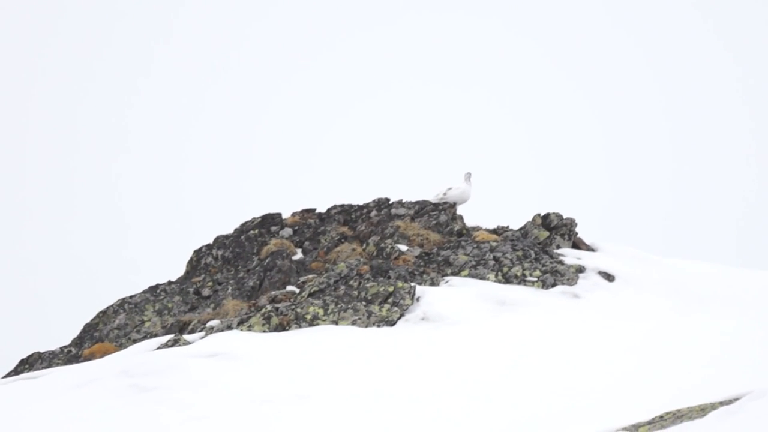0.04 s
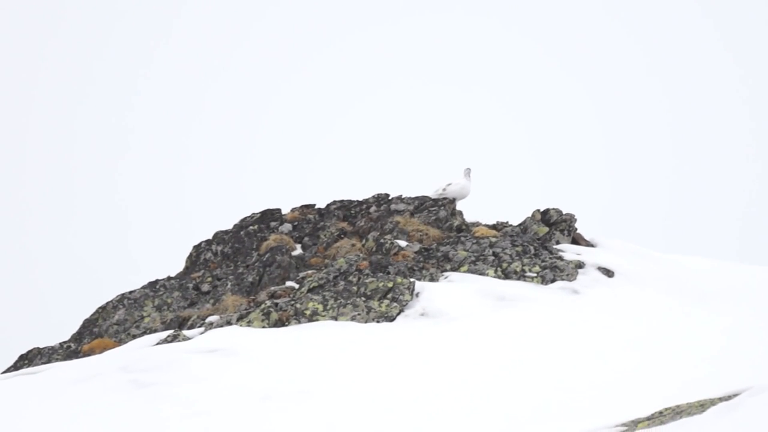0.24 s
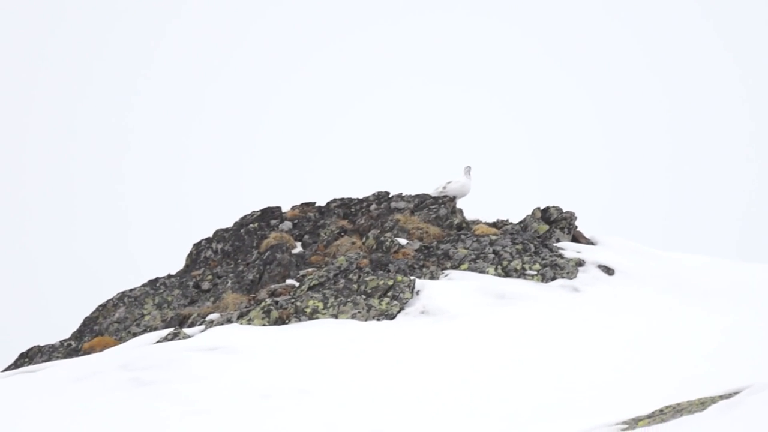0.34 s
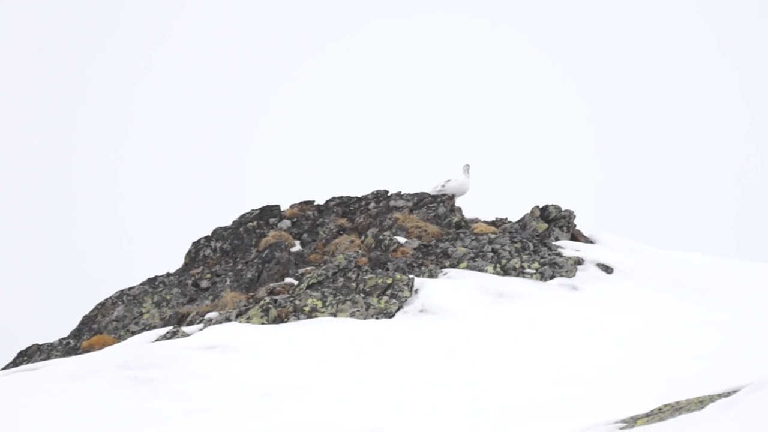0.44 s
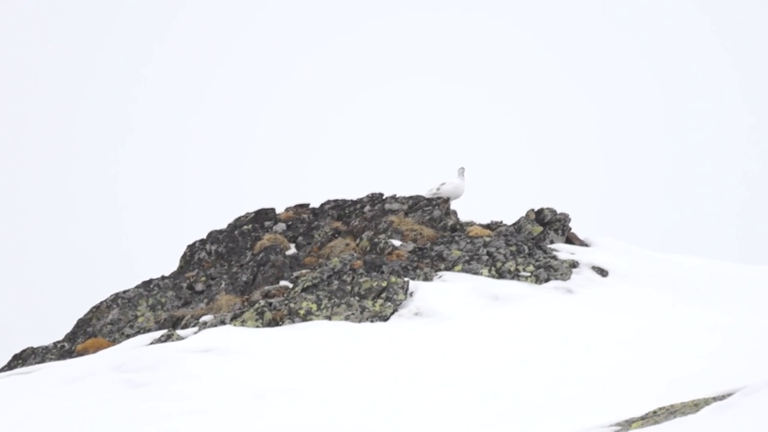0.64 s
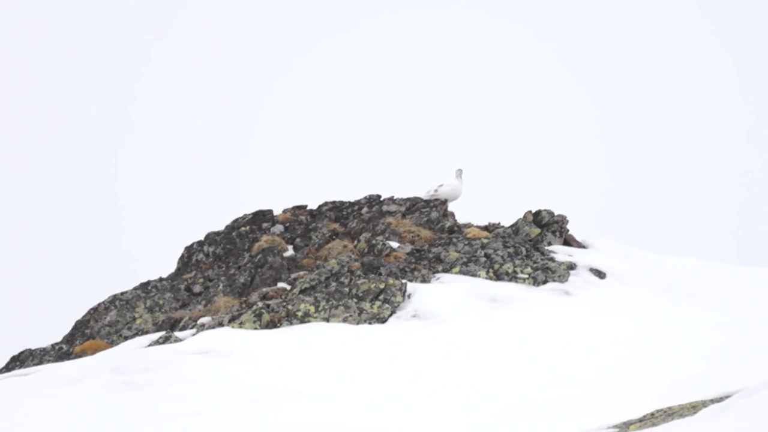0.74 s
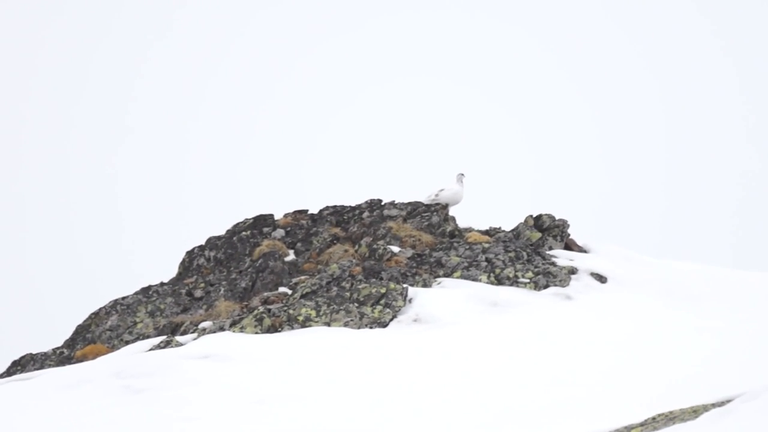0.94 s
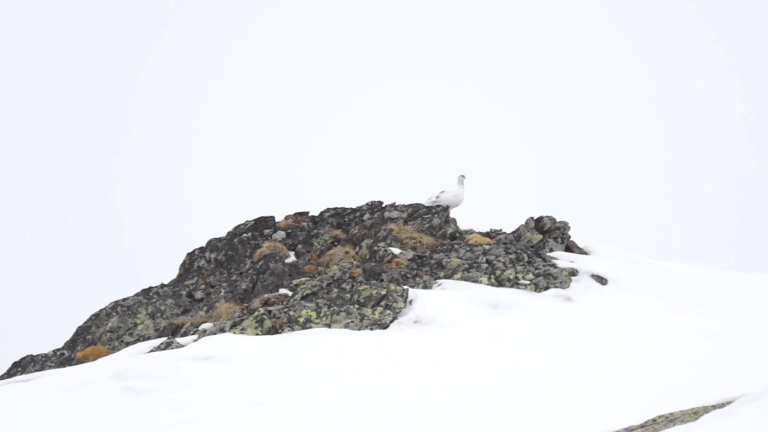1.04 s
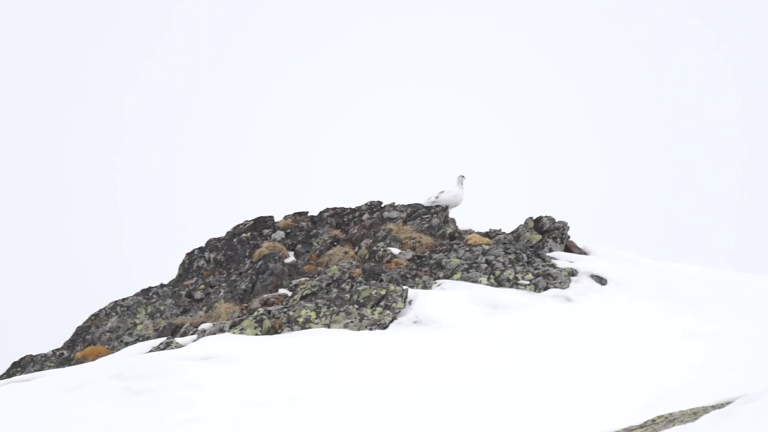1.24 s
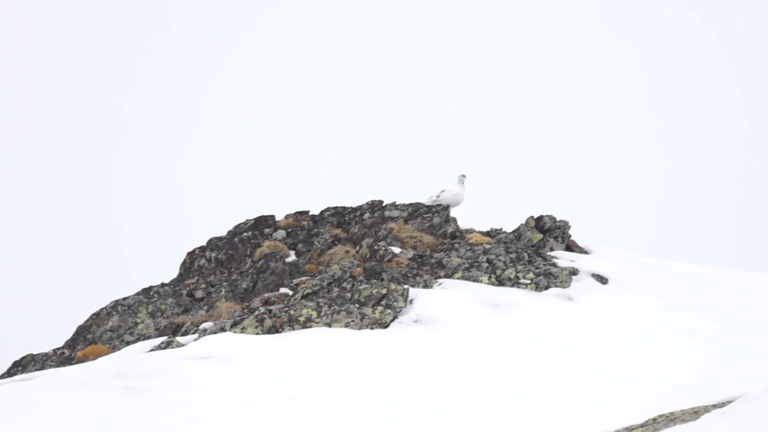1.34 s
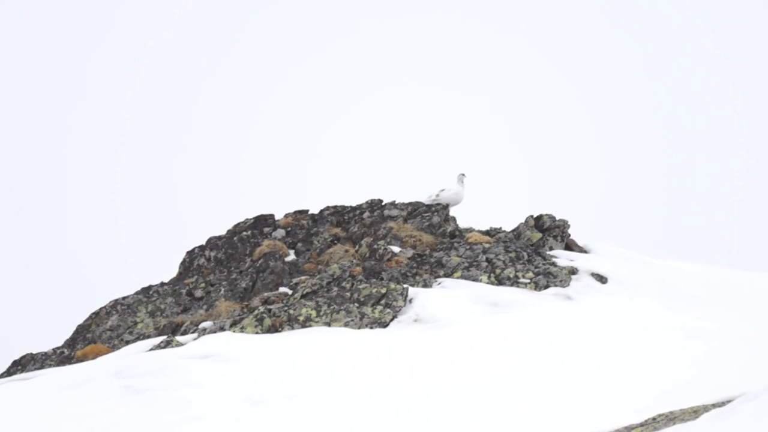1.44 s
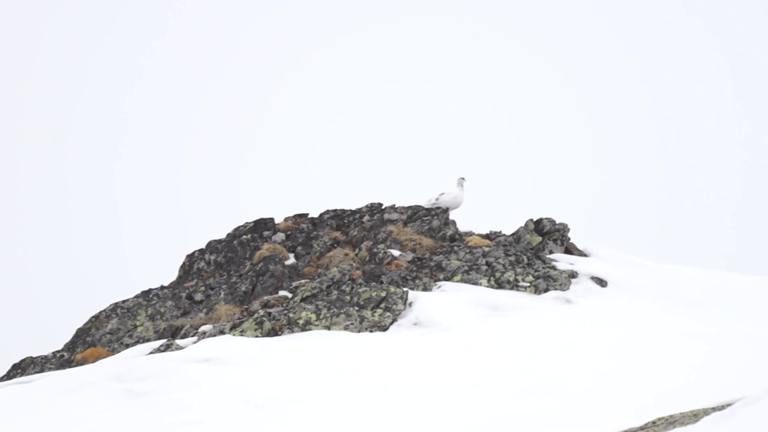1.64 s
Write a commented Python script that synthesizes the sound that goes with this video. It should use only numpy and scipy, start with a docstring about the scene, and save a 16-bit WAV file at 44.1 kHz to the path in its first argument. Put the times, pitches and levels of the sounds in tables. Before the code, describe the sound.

Light wind rumbling on the microphone, with one dull bump over a faint steady hiss.

```python
"""Light wind on a snowy mountainside, under a steady hiss.
From the start the air rumbles on the microphone and flutters round its housing.
Soon one gust throws a short run of eddies (small swirls of air) at it, the strongest a dull bump.
A few faint eddies follow after the first second. Near the end something small ticks once."""
import sys
import numpy as np
from scipy import signal
from scipy.fft import rfft, irfft
from scipy.io import wavfile

SR = 44100
rng = np.random.default_rng(int(sys.argv[2]) if len(sys.argv) > 2 else 0)


def master(y):
    """Save y as 16-bit WAV."""
    cut = np.clip(np.atleast_2d(y).T, -1, 1)
    pcm = np.round(cut * 32767)  # scale
    wavfile.write(sys.argv[1], SR, pcm.astype(np.int16))


N = 74970
TIME = np.arange(N) / SR
FREQS = np.maximum(np.arange(N // 2 + 1) * SR / N, 1)


def from_db(db):
    """Turn decibels into a number to multiply by."""
    return 10 ** (np.asarray(db) / 20)


def unit_level(x):
    """Scale a signal so that its average level (rms) is 1."""
    return x / np.sqrt(np.mean(x ** 2) + 1e-20)


def over_hz(points):
    """Join a table's points into a curve over all pitches."""
    hz, value = np.transpose(points)
    return np.interp(np.log(FREQS), np.log(hz), value)


def noise(colour):
    """Noise with a given colour: how strong each pitch is next to the others."""
    return unit_level(irfft(rfft(rng.standard_normal(N)) * from_db(over_hz(colour)), N))


def turbulence(levels, colour, lumpy_db, rate_hz):
    """Lumpy air noise that follows the strength of the wind."""
    loudness = from_db(np.interp(TIME, *np.transpose(levels)))
    air = noise(colour)
    drift = unit_level(irfft(rfft(rng.standard_normal(N)) / (1 + (FREQS / rate_hz) ** 2), N))
    return loudness * unit_level(air * from_db(lumpy_db * drift))


# How the rumble swells and fades: time_s, level_db
RUMBLE_LEVELS = [(0, -49), (.04, -44), (.15, -46), (.21, -36.5), (.31, -36), (.41, -32), (.47, -40),
                 (.5, -45.5), (.77, -45.5), (.83, -50), (1.1, -53), (1.14, -45.5), (1.29, -42),
                 (1.34, -44.5), (1.48, -48.5), (1.63, -42.5), (1.7, -53)]
# The rumble's deep tone: pitch_hz, relative_level_db
RUMBLE_TONE = [(15, -26), (28, -1), (45, -3.5), (62, 1), (100, -2), (150, -9.5), (250, -20), (500, -51)]
def rumble():
    """Wind pushes on the microphone and makes a low rumble."""
    return turbulence(RUMBLE_LEVELS, RUMBLE_TONE, lumpy_db=-0.5, rate_hz=8.7)


# How the flutter swells and fades: time_s, level_db
FLUTTER_LEVELS = [(0, -44.5), (.12, -39), (.24, -40.5), (.33, -38), (.42, -43), (.5, -45.5), (.57, -46.5),
                  (.63, -40), (.8, -42.5), (.95, -44.5), (1.12, -48.5), (1.3, -43.5), (1.4, -47.5),
                  (1.53, -46), (1.7, -46)]
# The flutter's hollow tone: pitch_hz, relative_level_db
FLUTTER_TONE = [(60, -32), (130, -5), (200, -4), (245, -3.5), (290, -0.5), (360, -9.5), (550, -11),
                (900, -24), (2000, -76)]
def flutter():
    """Air flutters as it flows round the microphone's housing."""
    return turbulence(FLUTTER_LEVELS, FLUTTER_TONE, lumpy_db=0.5, rate_hz=20)


# How far the right channel lags behind the left: pitch_hz, lag_radians
RIGHT_LAG = [(20, 0.34), (43, 0.21), (86, 1.07), (172, 1.05), (258, 1.61), (344, 1.99), (650, 2.16)]
def widen(wind):
    """Spread the wind in stereo, the right channel lagging slightly behind the left."""
    half_shift = np.exp(.5j * over_hz(RIGHT_LAG))
    return np.array([irfft(rfft(wind) * half_shift, N), irfft(rfft(wind) / half_shift, N)])


# The tone of the hiss in the middle: pitch_hz, relative_level_db
CENTRE_TONE = [(60, -28), (300, -2), (550, 5), (1000, 3.5), (2000, 1), (4000, -1.5), (8000, -4),
               (15500, -8)]
# The tone of the hiss out to the sides: pitch_hz, relative_level_db
WIDE_TONE = [(60, -13), (250, 1), (550, -4), (750, -4), (1200, -6), (2000, -10), (3500, -15.5), (8000, -22),
             (12000, -24.5), (15500, -26)]
def hiss():
    """Far air makes a steady, wide rush; its highest part sits nearer the middle."""
    centre = from_db(-50) * noise(CENTRE_TONE)
    wide = from_db(-45.5) * noise(WIDE_TONE)
    return np.array([centre + wide, centre - wide])


def puff(peak_s, level_db, pitch_hz, width_cycles):
    """A swing of air pressure that swells and dies within a cycle or two."""
    cycles = (TIME - peak_s) * pitch_hz
    swell = 1 / np.cosh(np.minimum(np.abs(cycles / width_cycles), 20))
    return from_db(level_db) * swell * np.cos(2 * np.pi * cycles)


# One row for each eddy, higher in pitch while the gust is fast: peak_s, level_db, pitch_hz
EDDY_PUFFS = [(0.041, -35, 70), (0.2186, -21, 120), (.248, -28, 212), (.272, -26, 122),
              (0.2937, -18.5, 164), (.302, -14.5, 238), (0.33, -15, 174), (0.339, -19, 148),
              (0.3551, -21.5, 250), (0.392, -20, 127), (0.406, -18, 142), (0.425, -27, 120),
              (.467, -29.5, 84), (1.149, -35, 60.7), (1.24, -33.5, 66.4), (1.274, -34, 70),
              (1.303, -34.5, 72.4), (1.535, -35.5, 131), (1.631, -43, 70)]
def eddies():
    """Swirls of air pass the microphone, each making a short, dull puff."""
    return sum(puff(*eddy, width_cycles=0.44) for eddy in EDDY_PUFFS)


def bump(peak_s=.3639, half_width_s=0.0024, high_cut_hz=594, low_cut_hz=63):
    """The gust peaks: one push of pressure between two dips, with a brief, higher knock on its front."""
    offset = (TIME - peak_s) / half_width_s
    pulse = from_db(-2.5) * (1 - 3 * offset ** 2) / (1 + offset ** 2) ** 3
    pulse = irfft(rfft(pulse) / (1 + (FREQS / high_cut_hz) ** 4), N)
    # The microphone cuts the deepest bass, which makes the pulse lopsided.
    pulse = signal.sosfilt(signal.butter(2, low_cut_hz, "high", fs=SR, output="sos"), pulse)
    knock = puff(peak_s=.3625, level_db=-22.5, pitch_hz=583, width_cycles=0.56)
    return pulse - knock


# The notes that ring in the tick: pitch_hz, relative_level_db, ring_s (time to fade by 60 dB)
TICK_NOTES = [(1550, -10, 0.035), (2230, -3.5, 0.029), (3450, 0, 0.013), (3835, 1.5, 0.013),
              (5000, -1, .011), (6800, 0, .015)]
def tick(start_s=1.6452, gain_db=-37.5, pan_db=2.5, left_delay_s=.00006, rise_s=.0004):
    """One light touch makes something small and hard ring, slightly to the right."""
    age = np.maximum(TIME - start_s - np.array([[left_delay_s], [0]]), 0)
    ringing = sum(from_db(db - 60 * age / ring_s) * np.sin(2 * np.pi * hz * age)
                  for hz, db, ring_s in TICK_NOTES)
    rise = 1 - np.exp(-age / rise_s)
    return ringing * rise * from_db(gain_db + pan_db * np.array([[-1], [1]]))


def scene():
    """Add up the wind on the microphone, the hiss and the tick."""
    wind = rumble() + flutter() + eddies() + bump()
    return widen(wind) + hiss() + tick()


def record(dry, right_db=0.47, cutoff_hz=15850):
    """Cut off the very highest pitches and make the right side a little louder."""
    high_cut = 1 / np.sqrt(1 + (FREQS / cutoff_hz) ** 400)
    balance = from_db(right_db * np.array([[-.5], [.5]]))
    return np.array([irfft(rfft(channel) * high_cut, N) for channel in dry]) * balance


dry = scene()
out = record(dry)
master(out)
```